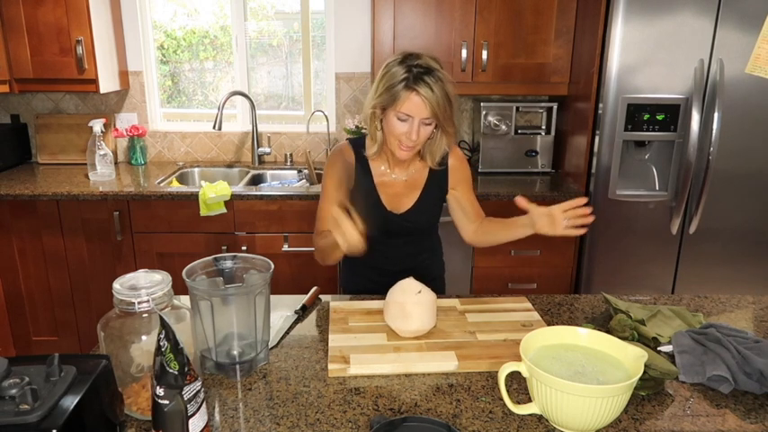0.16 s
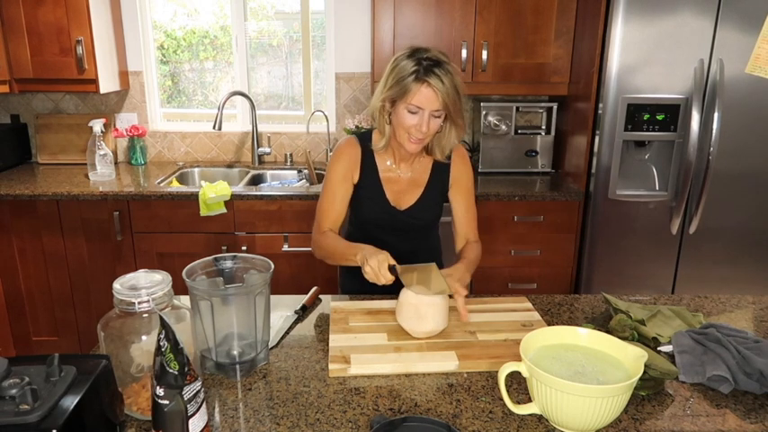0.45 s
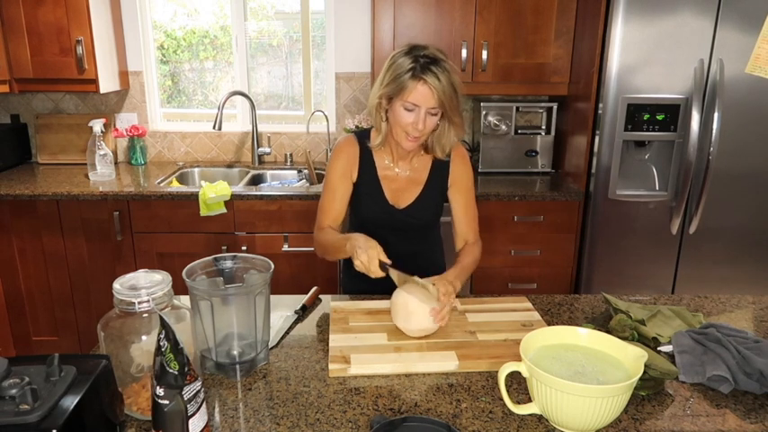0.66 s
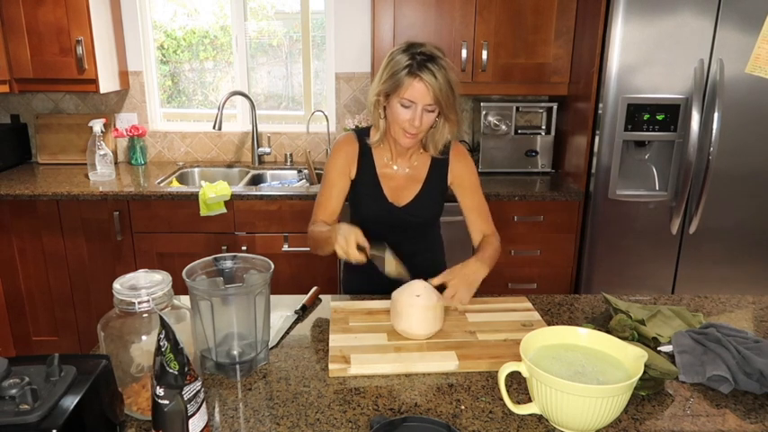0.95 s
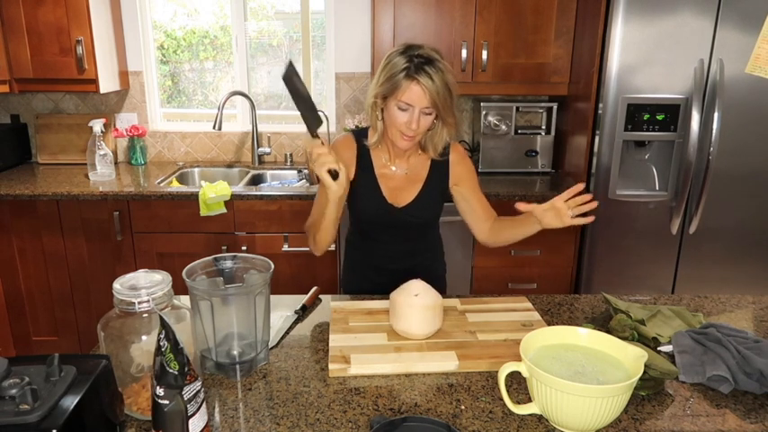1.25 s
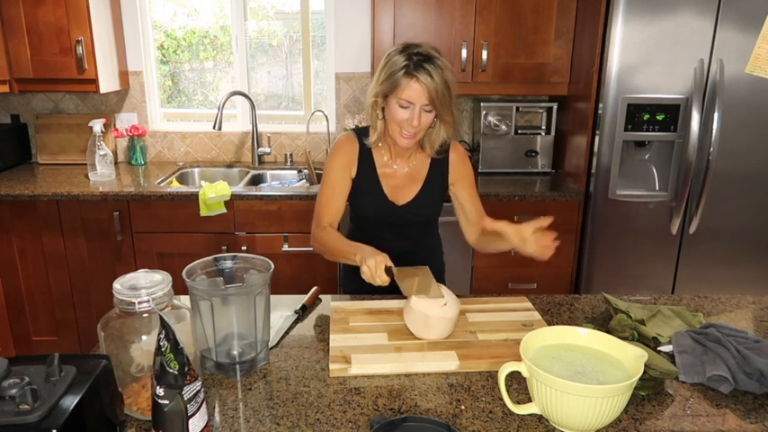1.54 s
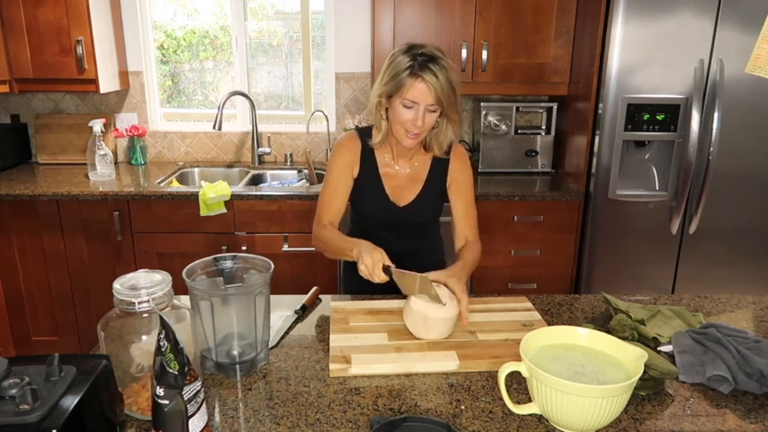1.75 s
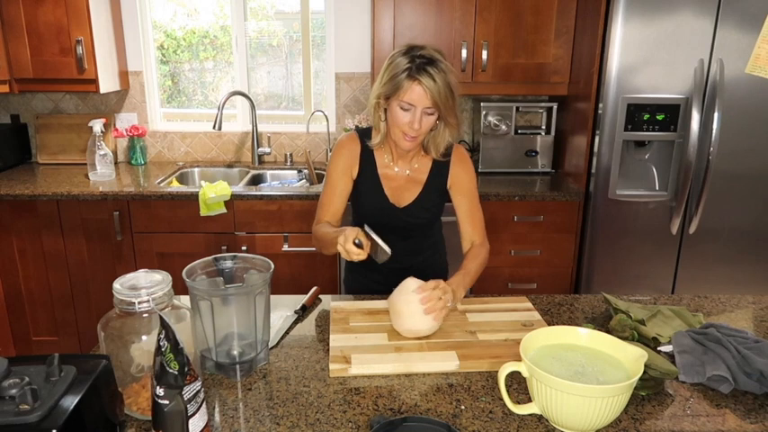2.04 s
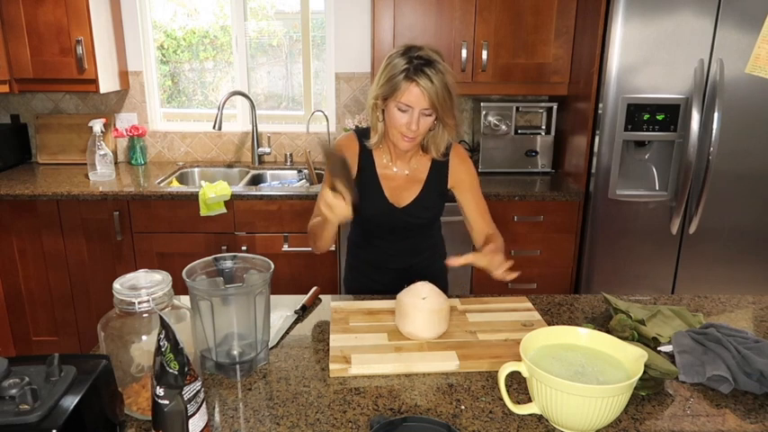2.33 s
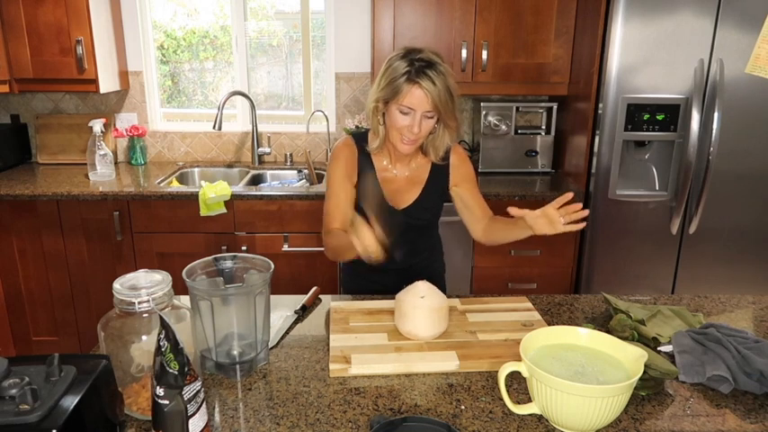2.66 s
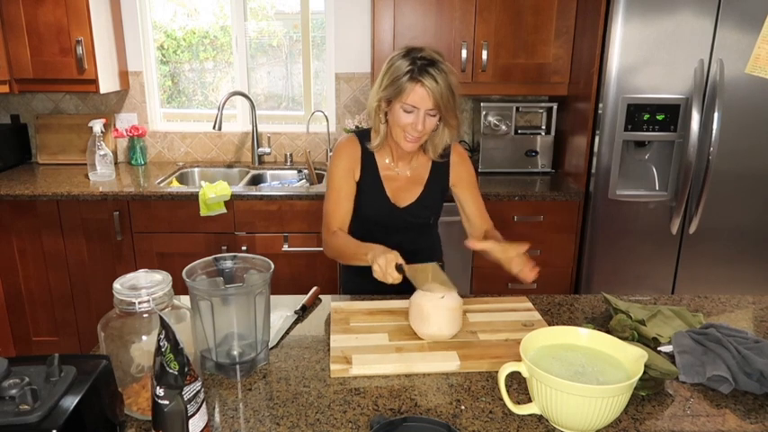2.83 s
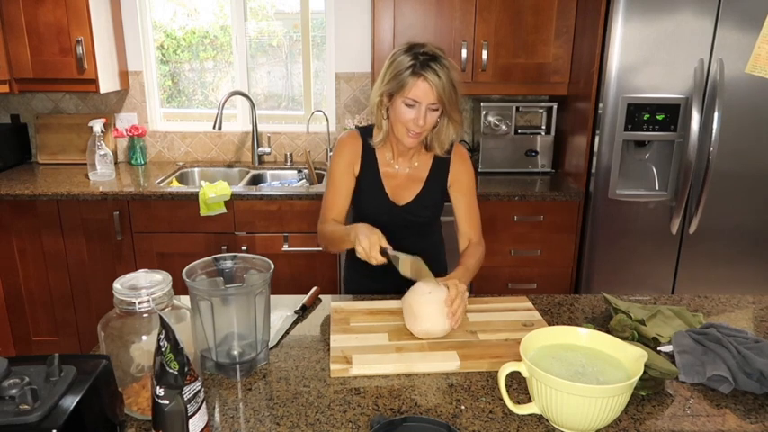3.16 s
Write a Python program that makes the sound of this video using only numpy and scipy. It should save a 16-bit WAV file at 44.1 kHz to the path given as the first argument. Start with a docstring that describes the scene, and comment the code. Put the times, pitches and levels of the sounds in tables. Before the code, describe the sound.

A cleaver chops a husked coconut on a wooden board at about 0.3, 1.5 and 2.8 seconds. Each blow is a sharp tearing crack with short shell knocks, then a heavy low thud and hollow ring of about half a second. Small bumps follow as nut and board settle. Blade rubbing and a short high squeak come near 0.7-0.85. Bright kitchen reflections, faint hum and steady hiss surround it.

```python
"""Over faint appliance hum and microphone hiss, a cleaver is chopped three times into a husked coconut on a
wooden board. Each blow opens with a tearing crack (shaped noise) and two very short shell notes (damped
resonances), then a low thud (one low cycle) sets body modes and a hollow note ringing. Nut and board then rock
and settle. Around the blows the blade rubs in the husk (grainy noise); after the first it squeaks once
(stick-slip tone), and thin tones swell and fade. A hard-walled kitchen answers with dense reflections."""
import sys
import numpy as np
from scipy import signal
from scipy.fft import rfft, irfft
from scipy.io import wavfile
from scipy.ndimage import uniform_filter1d

SR = 44100
rng = np.random.default_rng(int(sys.argv[2]) if len(sys.argv) > 2 else 0)


def store_wav(level_fs):
    """Save 16-bit WAV to argv[1]."""
    pcm = np.round(np.clip(np.atleast_2d(level_fs), -1, 1) * 32767)
    wavfile.write(sys.argv[1], SR, pcm.T.astype(np.int16))


N = 145530
TIME = np.arange(N) / SR   # s

# Cleaver blows: (time [s], crack level [dB], cut length [s], thud level [dB],
# lower shell note [Hz], upper shell note [Hz])
BLOWS = [(0.309, -10, 0.0065, -4.5, 1850, 3580), (1.501, -8, 0.0032, -5.5, 1566, 4380),
         (2.802, -6.5, 0.005, -6.5, 1605, 4080)]
# Nut and board rock and settle: (time [s], click level [dB], thud level [dB], thud frequency [Hz])
KNOCKS = [(.441, -29, -18, 123), (0.471, -64, -18, 102), (0.539, -67, -25, 65), (0.597, -70, -32.5, 81),
          (1.39, -52, -88, 97), (1.595, -26, -21.5, 75.5), (1.667, -62, -29, 91), (2.905, -73, -50, 80),
          (2.963, -56, -24.5, 82.6)]
THUD_DELAY_S = 0.00515   # from the start of the crack to the thud


def from_db(db):
    """Amplitude gain of a level in dB: twenty decibels per factor of ten."""
    return 10 ** (np.asarray(db) / 20)


def rms_one(x):
    """Normalisation to unit root-mean-square amplitude."""
    return x / np.sqrt(np.mean(x ** 2) + 1e-20)


def at_hz(points, hz):
    """Interpolation of a spectrum table on a logarithmic frequency axis."""
    table = np.array(points)
    return np.interp(np.log(hz), np.log(table[:, 0]), table[:, 1])


def coloured(x, spectrum):
    """Spectral shaping: follow the table, fade below its lowest frequency; rms 1."""
    hz = np.maximum(np.fft.rfftfreq(x.shape[-1], 1 / SR), 1)
    low_fade = np.minimum(1, hz / spectrum[0][0]) ** 4
    shaped = rfft(x) * from_db(at_hz(spectrum, hz)) * low_fade
    return rms_one(irfft(shaped, x.shape[-1]))


def stereo_noise(likeness, size):
    """Interchannel correlation: mid and side noise mixed so that likeness varies with frequency."""
    mid, side = rfft(rng.standard_normal((2, size)))
    hz = np.maximum(np.fft.rfftfreq(size, 1 / SR), 1)
    alike = np.clip(at_hz(likeness, hz), -1, 1)
    return irfft(np.sqrt(1 + alike) * mid + np.sqrt(1 - alike) * side * [[1], [-1]], size)


def narrow_noise(hz, width_hz):
    """Band-pass filtering of white noise; rms 1."""
    band = signal.butter(2, [hz - width_hz / 2, hz + width_hz / 2], "band", fs=SR, output="sos")
    return rms_one(signal.sosfilt(band, rng.standard_normal(N)))


def ring(x, modes):
    """Modal superposition: x excites a sum of exponentially damped resonances (Hz, dB, t60 in s)."""
    out = 0
    for hz, db, t60 in modes:
        radius = from_db(-60 / (t60 * SR))
        angle = 2 * np.pi * hz / SR
        feedback = [1, -2 * radius * np.cos(angle), radius * radius]
        out = out + from_db(db) * signal.lfilter([0, np.sin(angle)], feedback, x + 1e-18)
    return out


def clicks(times, db):
    """Ideal impulses: single samples at the given times."""
    out = np.zeros(N)
    out[(np.asarray(times) * SR).astype(int)] = from_db(db)
    return out


def swell(s, length):
    """Raised-cosine envelope: a smooth rise and fall."""
    return np.sin(np.pi * np.clip((TIME - s) / length, 0, 1)) ** 2


def low_cycles(rows):
    """Impulsive displacement: one low cycle, down then up, for each (s, dB, Hz), then a low cut."""
    push = 0
    for s, db, hz in rows:
        push = push - from_db(db) * np.sin(2 * np.pi * np.clip((TIME - s) * hz, 0, 1))
    return signal.sosfilt(signal.butter(3, 90, "high", fs=SR, output="sos"), push)


def background():
    """Stationary noise and steady sinusoids: microphone hiss and appliance tones."""
    # Hiss spectrum: (frequency [Hz], relative level [dB per Hz])
    hiss_spectrum = [(15, -21), (25, -2.5), (71, -1.5), (176, -4), (207, -7), (344, -4), (856, -15),
                     (927, -14.5), (1060, -15), (1150, -15.5), (6900, -31), (12800, -40), (15000, -89)]
    # Correlation of the hiss: (frequency [Hz], left-right likeness [-1 to 1])
    hiss_likeness = [(40, 1), (110, 0.28), (200, .5), (400, .2), (1500, 0.3), (14000, .05)]
    # Appliance tones: (frequency [Hz], level [dB rms])
    hum_tones = [(48.4, -62), (13017, -83.5)]
    hiss_db = -51.5   # rms
    tones = sum(np.sqrt(2) * from_db(db) * np.sin(2 * np.pi * hz * TIME) for hz, db in hum_tones)
    return from_db(hiss_db) * coloured(stereo_noise(hiss_likeness, size=N), hiss_spectrum) + tones


def kitchen(x):
    """Reverberation: convolution with dense noise that decays exponentially, band by band."""
    # Decay of the room: (frequency [Hz], t60 [s])
    room_decay = [(100, 0.65), (300, 0.43), (700, 0.5), (1500, 0.56), (3000, 0.58), (5500, 0.54),
                  (9000, 0.4), (14000, .2)]
    # Colour of the reflections: (frequency [Hz], relative level [dB])
    room_colour = [(100, -26), (300, -1), (700, 6), (1500, 0.5), (3000, -2), (5500, -0.5), (9000, 0.5),
                   (14000, 4)]
    # Correlation of the reflections: (frequency [Hz], left-right likeness, limited to [-1 to 1])
    room_likeness = [(100, .998), (400, 0.95), (1000, 1), (2000, 0.97), (4000, 0.73), (7000, -0.19),
                     (14000, -1.16)]
    room_db, onset_s = 1, 0.0021   # silent for one onset time, then rising for another
    t = np.arange(SR) / SR
    edges = 70 * 2 ** np.arange(0, 8, .5)   # half-octave bands [Hz]
    white, tail = stereo_noise(room_likeness, size=SR), 0
    for low, high in zip(edges, edges[1:]):
        hz = np.sqrt(low * high)
        band = signal.sosfilt(signal.butter(2, [low, high], "band", fs=SR, output="sos"), white)
        t60 = max(at_hz(room_decay, hz), .05)
        tail = tail + band * from_db(at_hz(room_colour, hz) - 60 * t / t60)
    tail = tail * np.clip(t / onset_s - 1, 0, 1)
    tail = tail / np.sqrt(np.sum(tail ** 2) / 2)   # unit energy per channel on average
    return from_db(room_db) * signal.fftconvolve(x[None], tail, axes=1)[:, :N]


def faint_tones():
    """Amplitude-modulated sinusoids: thin high tones come and go between blows."""
    # Thin tones: (time [s], length [s], frequency [Hz], level at the peak of the swell [dB rms])
    thin_tones = [(.733, 0.042, 1980, -48), (0.82, 0.32, 2510, -60), (1.106, 0.29, 2100, -66.5),
                  (1.937, 0.17, 2503, -66.5), (2.142, 0.13, 2503, -66.5)]
    out = 0
    for s, length, hz, db in thin_tones:
        tone = np.sqrt(2) * np.sin(2 * np.pi * hz * TIME)
        out = out + from_db(db) * swell(s, length) ** .5 * tone
    return out


def squeak():
    """Stick-slip friction of wet steel in the husk; overtones rise and fall unevenly as it dies away."""
    # Course of the squeak: (time [s], slip rate [Hz], levels of harmonics 1, 2, 3, 4 [dB rms])
    slips = [(0.759, 1627, -65.5, -59, -60, -85), (0.769, 1651, -31.5, -27.5, -40, -55),
             (0.785, 1666, -30.5, -45, -35.5, -76.5), (0.804, 1646, -31.5, -53.5, -50, -57.5),
             (0.82, 1642, -41.5, -41, -92, -50), (0.847, 1642, -58, -39.5, -78, -63.5),
             (0.869, 1642, -67, -53.5, -38, -56)]
    s, hz, *levels = np.transpose(slips)
    phase = 2 * np.pi * np.cumsum(np.interp(TIME, s, hz)) / SR
    out = 0
    for harmonic, db in enumerate(levels, start=1):
        gain = from_db(np.interp(TIME, s, db, -200, -200))   # inaudible outside the table
        out = out + np.sqrt(2) * gain * np.sin(harmonic * phase)
    return out


def rubs():
    """Sliding friction: swells of grainy scraping noise, with a narrower hiss from the edge."""
    # Blade in the husk: (time [s], length [s], scrape level [dB rms], edge hiss level [dB rms]) at the peak
    strokes = [(0.154, 0.092, -63, -72), (0.664, 0.06, -43.5, -47), (0.736, 0.097, -42, -71),
               (2.037, 0.14, -59, -65.5), (3.11, 0.066, -57.5, -69)]
    # Scrape spectrum: (frequency [Hz], relative level [dB per Hz])
    scrape_spectrum = [(290, -76.5), (500, -34), (1640, 4), (2020, -1.5), (3380, 0), (4850, -5.5),
                       (5980, -15), (14000, -25)]
    grains = rng.standard_normal(N) * rng.exponential(1, N)
    scrape = coloured(grains, scrape_spectrum)
    edge = narrow_noise(3310, width_hz=510)
    out = 0
    for s, length, db, edge_db in strokes:
        out = out + swell(s, length) * (from_db(db) * scrape + from_db(edge_db) * edge)
    return out


def blade():
    """Free vibration: the steel rings faintly, and equally, at each blow."""
    # Modes of the steel: (frequency [Hz], level [dB], t60 [s])
    steel_modes = [(1825, -42, .4), (2123, -46, 0.86), (4560, -46.5, .6)]
    return ring(clicks([b[0] for b in BLOWS], 0), steel_modes)


def hollow():
    """Closely spaced resonances as narrow-band noise: a wavering hollow note lingers after each thud."""
    level_db, rise_s, t60_s = -13, 0.025, 0.51   # level relative to the thud
    thud_s = np.array([[b[0] + THUD_DELAY_S] for b in BLOWS])
    thud_db = np.array([[b[3]] for b in BLOWS])
    since = TIME - thud_s
    rise = np.clip(since / rise_s, 0, 1)
    shape = rise * from_db(thud_db - 60 * np.maximum(since, 0) / t60_s)
    return from_db(level_db) * shape.sum(axis=0) * narrow_noise(540.4, width_hz=97)


def shell():
    """Impact on a stiff shell: as the edge reaches it, two heavily damped notes answer."""
    low_db, high_db, t60_s = -3.5, 1, 0.036   # levels relative to the crack
    reached = 0.3587   # share of the cut at which the edge meets the shell
    out = 0
    for s, db, cut, _, low, high in BLOWS:
        notes = [(low, low_db, t60_s), (high, high_db, t60_s / 2)]
        out = out + ring(clicks([s + reached * cut], db), notes)
    return out


def thuds():
    """Momentum transfer: returns each blow's low cycle, then the modes it excites plus small landings."""
    # Board, counter and low room modes: (frequency [Hz], level relative to the thud [dB], t60 [s])
    body_modes = [(61.4, -17.5, 0.55), (82, -17.5, 0.64), (126.7, -11.5, .25), (164, -7.5, 0.21),
                  (224, -28, 0.21), (262.2, -25.5, 0.63), (343, -20.5, 0.36), (414, -23, 0.3),
                  (532, -20.5, 0.69)]
    thud_hz, spread_db, low_cut_hz = 193, 1.5, 64
    s, db = np.transpose([(b[0] + THUD_DELAY_S, b[3]) for b in BLOWS])
    body = 0
    for mode in body_modes:
        # each blow meets each mode a little differently
        met_db = db + spread_db * rng.standard_normal(len(s))
        body = body - ring(clicks(s, met_db), [mode])
    body = signal.sosfilt(signal.butter(2, low_cut_hz, "high", fs=SR, output="sos"), body)
    push = low_cycles(zip(s, db, [thud_hz] * len(s)))
    landings = low_cycles([(k[0], k[2], k[3]) for k in KNOCKS])
    return push, body + landings


def cracks():
    """Fracture noise: fibres tear, bright then dull; landings click. Returns near sound and room pulses."""
    # Crack spectrum: (frequency [Hz], relative level [dB per Hz])
    crack_spectrum = [(350, -38), (600, -6), (1490, -3), (2870, -6), (4110, -11.5), (5330, -13.5),
                      (5950, -19), (7110, -17), (12800, -27), (16000, -35)]
    # Correlation of the crack: (frequency [Hz], left-right likeness [-1 to 1])
    crack_likeness = [(1000, 1.), (2400, 0.99), (4400, 0.98), (8000, .3), (14000, 0.)]
    split_hz, dull_lag_s = 1900, 0.0019   # the dull part lies below the split and starts later
    bright_share, rise_share = 0.35, .6   # of the cut, until bright part decays; of each part, swelling
    t60_s, click_s = 0.044, 0.011   # decay after each part; cut length of a landing
    knock_bright_db = -5   # landings are duller than cuts
    wet_db = -4.5   # strength of the crack as the room hears it
    cuts = [(*b[:3], 0) for b in BLOWS]
    landings = [(k[0], k[1], click_s, knock_bright_db) for k in KNOCKS]
    s, db, length, bright = np.transpose(cuts + landings)
    shape = np.zeros((2, N))   # envelopes of the bright and dull parts
    for start, level_db, cut, bright_db in zip(s, db, length, bright):
        since = TIME - start - np.array([[0], [dull_lag_s]])
        end = np.array([[bright_share * cut], [cut - dull_lag_s]])
        rise = np.clip(since / (rise_share * end), 0, 1)
        decay = from_db(-60 * np.clip(since - end, 0, 1) / t60_s)
        shape += from_db([[level_db + bright_db], [level_db]]) * rise * decay
    noise = coloured(stereo_noise(crack_likeness, size=N), crack_spectrum)
    dull = signal.sosfiltfilt(signal.butter(2, split_hz, fs=SR, output="sos"), noise)
    near = shape[0] * (noise - dull) + shape[1] * dull
    pulse = coloured(np.eye(1, 256, 128)[0], crack_spectrum)   # an impulse at sample 128
    return near, np.convolve(clicks(s, db + wet_db), pulse)[:N]


def scene():
    """Linear superposition: direct sources, their reverberation and the background."""
    thud_wet_db, squeak_wet_db = 4, -5.5   # strengths as the room hears them
    crack, pulse = cracks()
    push, body = thuds()
    squeal = squeak()
    steel = blade() + rubs()
    wet = kitchen(pulse + steel + from_db(thud_wet_db) * push + from_db(squeak_wet_db) * squeal)
    near = crack + shell() + hollow() + push + steel + squeal + body + faint_tones()
    return near + wet + background()


def record(dry):
    """Dynamic compression: gain ducks after loud blows and creeps back; peaks clip; the top is cut."""
    above_db, duck_share, back_db_per_s, cutoff_hz = -20.5, 0.22, 3, 16600
    power = uniform_filter1d(np.mean(dry ** 2, axis=0), size=441)   # 10 ms average
    level_db = 10 * np.log10(power + 1e-12)
    duck_db = duck_share * np.maximum(level_db - above_db, 0)
    # hold each peak, released at a constant rate
    release = back_db_per_s * TIME
    held = np.maximum(np.maximum.accumulate(duck_db + release) - release, 0)
    held = signal.lfilter([.002], [1, -.998], held)   # smoothed over about 11 ms
    clipped = np.clip(dry * from_db(-held), -.96, .96)
    return signal.sosfilt(signal.cheby2(12, 70, cutoff_hz, fs=SR, output="sos"), clipped)


dry = scene()
out = record(dry)
store_wav(out)
```